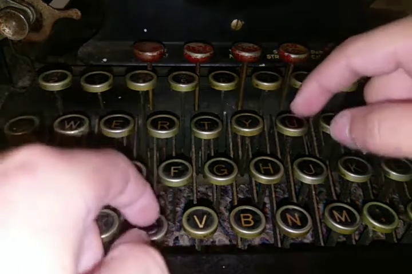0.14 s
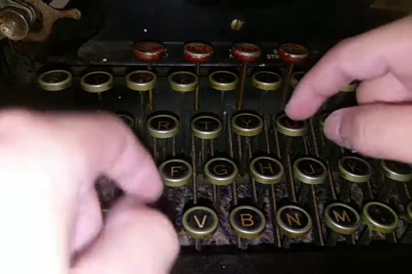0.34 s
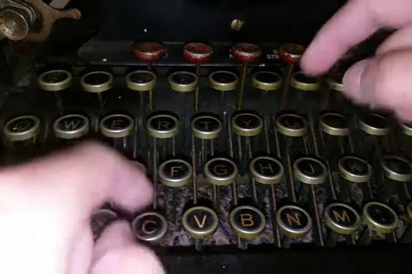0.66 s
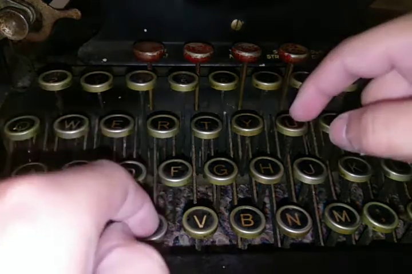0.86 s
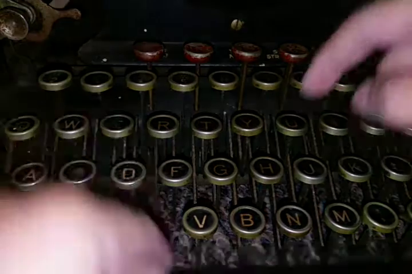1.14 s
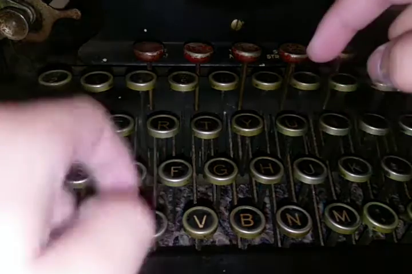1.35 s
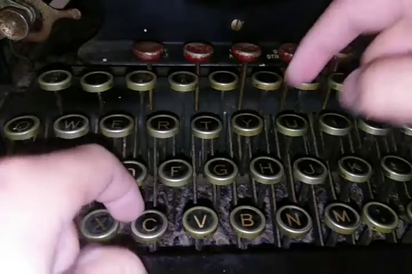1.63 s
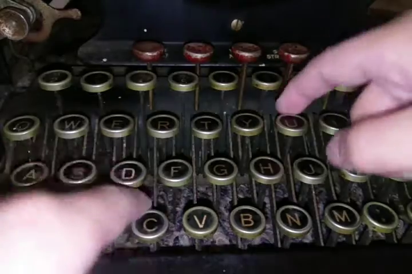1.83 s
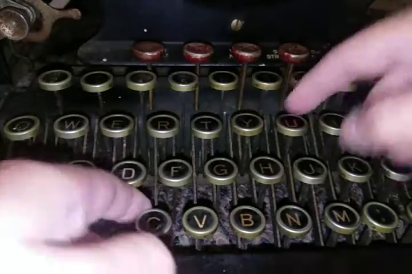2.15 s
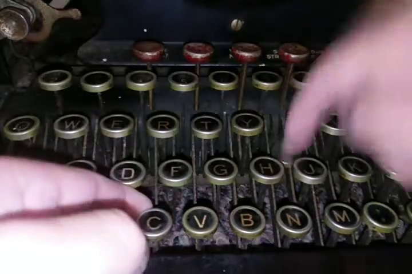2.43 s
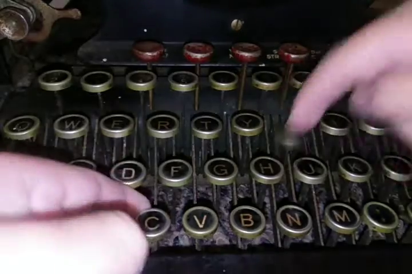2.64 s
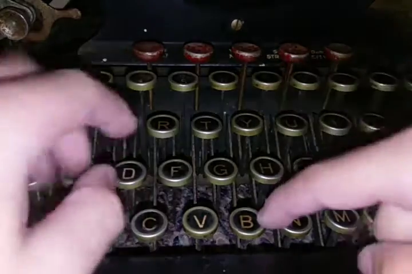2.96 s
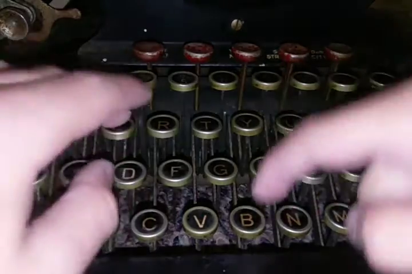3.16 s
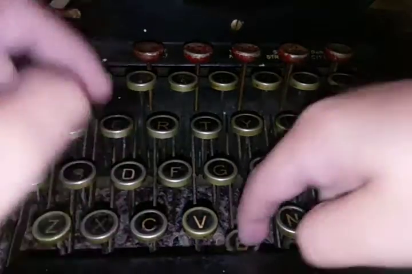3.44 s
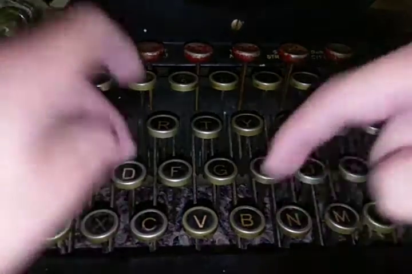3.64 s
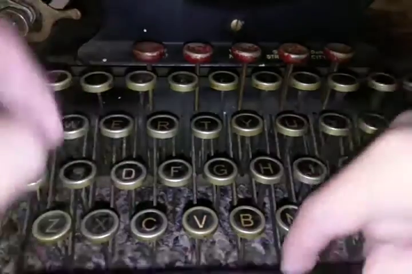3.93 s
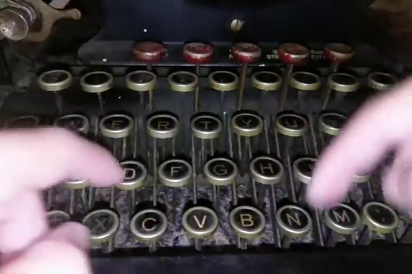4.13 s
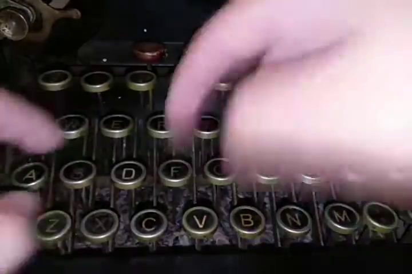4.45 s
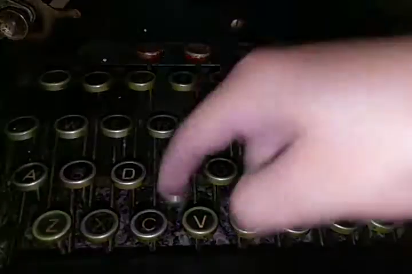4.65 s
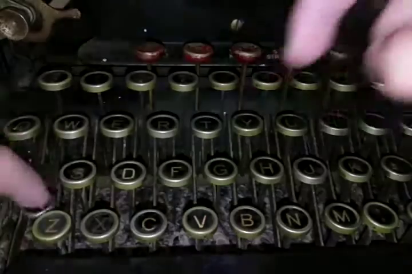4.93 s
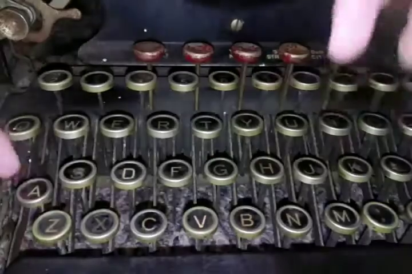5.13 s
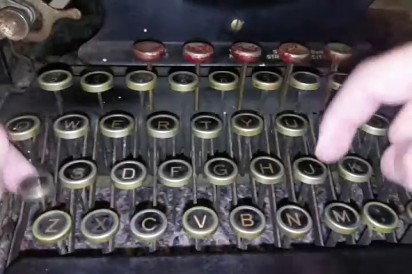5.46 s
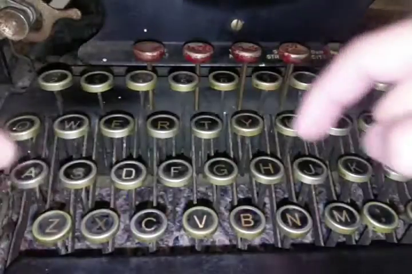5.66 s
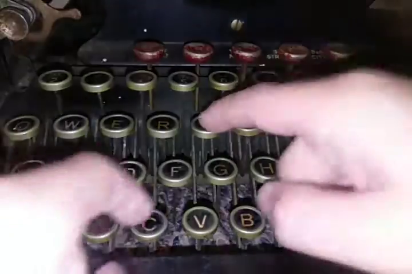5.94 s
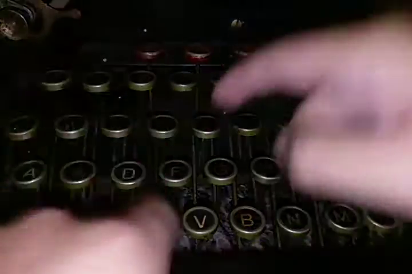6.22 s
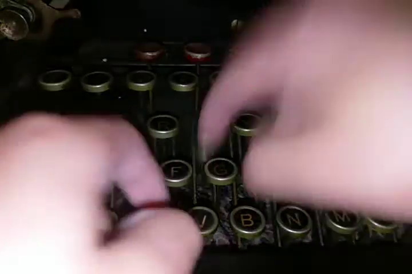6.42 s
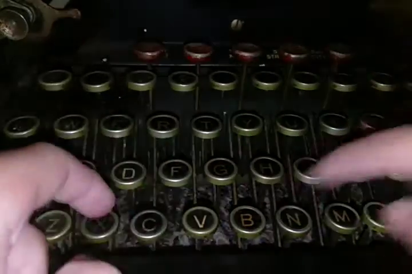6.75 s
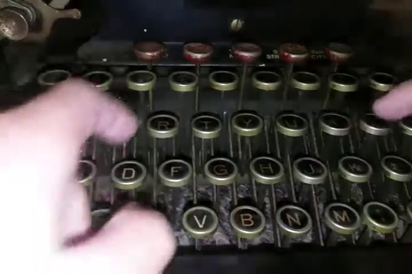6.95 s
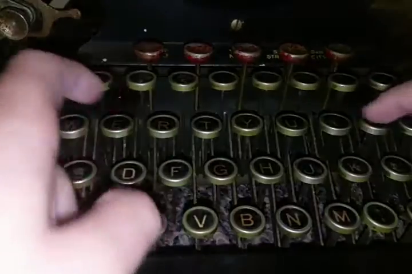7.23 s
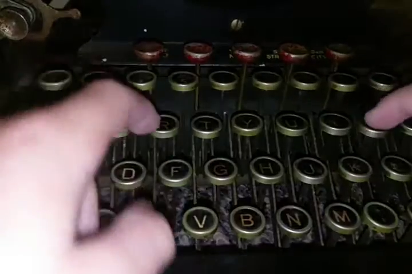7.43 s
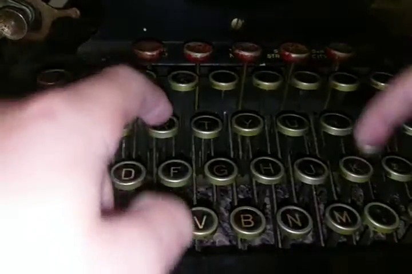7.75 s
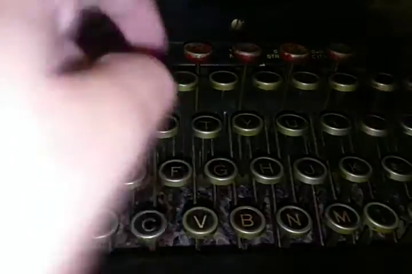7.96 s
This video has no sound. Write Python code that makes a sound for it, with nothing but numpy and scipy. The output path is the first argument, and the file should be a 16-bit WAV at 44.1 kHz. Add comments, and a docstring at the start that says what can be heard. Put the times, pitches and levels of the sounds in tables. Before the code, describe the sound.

Keys of an old manual typewriter clack slowly and unevenly, close by, with small mechanical clicks between strokes in a quiet room.

```python
"""A small quiet room: two fingers peck at an old manual typewriter, close by.
Per stroke the key lever clicks, the escapement trips, the type slaps the platen and rings the steel
frame, then the typebar drops on its rest and the desk shudders. The carriage catch clicks on key
release. One key jams with a hollow knock. A hard surface and the room answer, over faint hiss and hum."""
import sys
import numpy as np
from scipy import signal
from scipy.fft import rfft, irfft
from scipy.io import wavfile
from scipy.ndimage import uniform_filter1d

SR = 44100
rng = np.random.default_rng(int(sys.argv[2]) if len(sys.argv) > 2 else 0)


def transcribe(signal):
    """Save signal, clipped to [-1, 1], as a 16-bit WAV file at the path in sys.argv[1]."""
    frames = np.atleast_2d(signal).T
    limited = np.clip(frames, -1, 1)
    pcm = np.round(limited * 32767).astype(np.int16)
    wavfile.write(sys.argv[1], SR, pcm)


N = 356636
T = np.arange(SR // 2) / SR  # seconds since a contact

# Letters. Each row: slap time in seconds, force in dB, body below 3 kHz in dB, sparkle above 7 kHz
# in dB, lever click gain in dB, key travel before the slap in seconds, typebar fall after it in seconds.
LETTERS = [ (1.088, -1, 0, 1.5, -23, .036, 0.092), (2.3993, .5, 2, .5, -18, 0.032, 0.15),
           (3.2778, 0, -.5, 1.5, -19.5, .0385, .143), (3.5191, 0.5, 0, 1, -21.5, .0444, .104),
           (3.743, -11.5, -5, 1, -21.5, .025, .1746), (4.4648, 1.5, 0, .5, -18.5, .0319, 0.13),
           (4.856, -0.5, -1.5, -2, -26, 0.041, 0.12), (6.1715, 1, -0.5, 0, -19, 0.039, .1077),
           (6.3818, .5, 0.5, -0.5, -19, 0.042, 0.13), (7.609, -1, -1, -0.5, -22.5, 0.049, .101),
           (7.9867, 2, -0.5, -1.5, -20, 0.037, 0.092)]
# Carriage catch clicks. Each row: start in seconds, gain in dB, body below 3 kHz in dB.
CATCH_CLICKS = [(1.1553, -17.5, -2), (1.229, -26, -0.5), (2.599, -19.5, 1.5), (3.5, -15.5, -1),
                (3.958, -23, -7.5), (4.6695, -26, -2), (5.4283, -23, -1.5), (6.5825, -21, -1.5),
                (7.7757, -25, -1.5)]
# Fingertips brushing keys. Each row: start in seconds, gain in dB.
KEY_TOUCHES = [(2.857, -47), (2.876, -53.5), (3.0337, -46.5), (3.057, -46), (3.099, -51.5), (5.1913, -49.5),
               (5.412, -44.5), (7.2855, -42.5), (7.419, -50.5)]
# Spectra of type slap, sharp click, dull clack, rocking machine. Each row: frequency in Hz, gain in dB.
SLAP_EQ = [(40, -33), (350, -30), (800, -32.5), (1500, -20), (3000, -15), (4400, -11.5), (5100, -4),
           (6300, -6), (7900, -2), (9000, -10.5), (12000, -22), (15500, -25)]
CLICK_EQ = [(40, -14.5), (200, -10), (500, -13), (1000, -13.5), (1700, -7), (2900, -6.5), (3550, -3.5),
            (4400, -6), (5400, -6), (6500, -1), (8100, -.5), (10000, -6), (12500, -14), (15500, -18)]
CLACK_EQ = [(60, -4), (200, -9), (500, -11.5), (800, -7), (1400, -5), (2200, 1.5), (3000, -4), (5400, -9),
            (7500, -5), (10000, -9), (12000, -18), (15500, -20)]
ROCKING_EQ = [(20, -22), (50, 1.5), (110, 2.5), (170, -8), (330, -9.5), (500, -15.5), (1200, -45.5),
              (4000, -81)]
# Steel frame and bar resonances. Each row: frequency in Hz, width in Hz, lift in dB.
FRAME_MODES = [(1005, 70, 5), (1560, 160, 3), (1830, 90, 3), (2240, 80, 5), (2410, 60, 3), (3270, 110, 4),
               (3930, 170, 5), (4865, 70, 7), (5150, 130, 3), (5385, 60, 5), (5490, 90, 4), (5890, 50, 4),
               (6843, 20, 6.5), (7105, 25, 3), (7540, 25, 4), (7738, 22, 7), (7990, 35, 3.5), (8360, 40, 3)]
# Hollow case modes. Each row: frequency in Hz, relative level in dB, T60 in seconds.
CASE_MODES = [(232, -3, 0.21), (316, 2, 0.13), (487, -3, 0.09), (770, 0, 0.06), (900, -3.5, 0.15),
              (1093, -15, 0.047), (1300, -13, 0.14)]
# Desk modes. Each row: frequency in Hz, relative level in dB, T60 in seconds, rise in seconds.
DESK_MODES = [(55.5, 3.5, 0.37, 0.034), (84, 5, 0.28, 0.056), (100, 2, 0.2, .025), (111, 1.5, 0.31, 0.029),
              (150, -8.5, .16, 0.015), (217, -12.5, 0.25, .004), (300, -14.5, 0.053, 0.0059)]
# Spectra of hard-surface echo, room tail, room hiss. Each row: frequency in Hz, gain in dB.
ECHO_EQ = [(200, -11.5), (2000, -13), (4500, -16), (6000, -11), (7500, -4), (9000, -10), (15000, -10)]
TAIL_EQ = [(60, -4.5), (300, -1.5), (1000, -4), (2500, -7), (4600, -10), (5500, -7), (6300, -4),
           (7600, -7.5), (9000, -9), (15000, -2.5)]
HISS_EQ = [(15, -50), (25, -26), (42, -6.5), (64, -0.5), (86, -11), (150, -10), (175, -17.5), (220, -17),
           (450, -25.5), (600, -25.5), (1100, -29), (3000, -32.5), (7500, -34), (15500, -44.5)]
# Room decay. Each row: frequency in Hz, T60 in seconds.
TAIL_DECAY = [(100, 0.19), (500, 0.225), (2000, 0.265), (7000, 0.29), (10000, .28), (15000, 0.16)]


def typing(trip_lead_s=.0092, slide_s=.015):
    """Per letter: key lever, escapement, slap, typebar return."""
    out = np.zeros(N)
    for at_s, force_db, body_db, sparkle_db, lever_db, travel_s, fall_s in LETTERS:
        add(out, at_s - travel_s, key_move(lever_db, body_db=-2.5))
        add(out, at_s - trip_lead_s, amp(force_db - 22) * escapement())
        add(out, at_s, amp(force_db + 5.5) * slap(body_db, sparkle_db))
        add(out, at_s + fall_s - slide_s, typebar_return(slide_s))
    return out


def slap(body_db, sparkle_db):
    """Type hits the platen; the roller clacks, loose bars and springs jingle."""
    blow = colour(burst(fade(.014) + amp(-21) * fade(.1)), SLAP_EQ)
    blow = in_room(weighted(blow, body_db, sparkle_db), echo_db=2)
    roller = colour(rattle(rough_db=2) * rise(.002) * fade(.045), CLACK_EQ)
    jingle = colour(rattle(rough_db=5) * rise(.005) * fade(.22), CLICK_EQ)
    return blow + amp(body_db - 19.5) * roller + amp(-35.5) * jingle


def escapement():
    """The escapement lets go with a short rasp."""
    rasp = colour(rattle(rough_db=1.5) * rise(.0008) * fade(.14), CLICK_EQ)
    return rasp + amp(-28) * desk_shudder()


def typebar_return(slide_s, gain_db=-25.5):
    """A spring pulls the bar home, whatever the force: slide, clack, desk shudder, one bounce."""
    out = np.zeros(N)
    slide = colour(rattle(rough_db=4) * rise(.005) * fade(.1), CLACK_EQ)
    clack = colour(rattle(rough_db=3.5) * rise(.001) * fade(.066), CLACK_EQ)
    bounce = colour(rattle(rough_db=3) * fade(.042), CLICK_EQ)
    add(out, 0, amp(gain_db - 13.5) * slide)
    add(out, slide_s, amp(gain_db) * in_room(clack) + amp(-45) * desk_shudder())
    add(out, slide_s + rng.uniform(.012, .025), amp(gain_db - 13) * bounce)
    return out


def lever_click(body_db):
    """A lever catches with a short chatter, then scrapes in its slot."""
    catch = rattle(rough_db=2.5) * rise(.0015) * fade(.038)
    scrape = rattle(rough_db=4) * amp(-24) * fade(.21)
    return amp(2) * in_room(weighted(colour(catch + scrape, CLICK_EQ), body_db))


def key_move(click_db, body_db):
    """A key going down or up clicks and nudges the desk."""
    return amp(click_db) * lever_click(body_db) + amp(-52) * desk_shudder()


def catch_and_touches():
    """The carriage catch clicks on release; brushed keys tick in their slots."""
    out = np.zeros(N)
    for at_s, gain_db, body_db in CATCH_CLICKS:
        add(out, at_s, key_move(gain_db, body_db))
    for at_s, gain_db in KEY_TOUCHES:
        add(out, at_s, amp(gain_db) * lever_click(body_db=0))
    return out


def jam(at_s=3.746):
    """A jammed key bottoms out: its bar clatters on its neighbours, the case rings hollow."""
    out = np.zeros(N)
    ring = sum(amp(db) * fade(t60_s) * np.sin(2 * np.pi * (hz * T + rng.random()))
               for hz, db, t60_s in CASE_MODES)
    clatter = colour(rattle(rough_db=1) * rise(.0016) * fade(.063), CLICK_EQ)
    add(out, at_s, amp(-33) * rise(.0012) * ring / np.abs(ring).max())
    add(out, at_s, amp(-12) * in_room(weighted(clatter, body_db=1)) + amp(-44.5) * desk_shudder())
    return out


def steel_frame(x):
    """The frame lifts its own resonances in every contact."""
    hz = np.fft.rfftfreq(len(T), 1 / SR)
    response = 1 + sum((amp(db) - 1) * 1j * hz * width_hz / (mode_hz ** 2 - hz ** 2 + 1j * hz * width_hz)
                       for mode_hz, width_hz, db in FRAME_MODES)
    return signal.fftconvolve(x, irfft(response)[:len(T) // 2])[:N]


def desk_shudder():
    """Low desk modes swell and decay, blurred by the loosely rocking machine."""
    rocking = unit(colour(noise(), ROCKING_EQ)) * rise(.017) * fade(.14)
    modes = np.zeros(len(T))
    for k, (hz, db, t60_s, rise_s) in enumerate(DESK_MODES):
        gain = (-1) ** k * amp(db + rng.normal(0, 1.9))
        modes += gain * rise(rise_s) * fade(t60_s) * np.sin(2 * np.pi * hz * T)
    return modes + amp(3) * rocking


def in_room(x, echo_db=-12, echo_s=.0157):
    """Direct sound, one hard-surface echo, diffuse tail."""
    hz, time_s, bands = signal.stft(noise(), SR, nperseg=256)
    decay = amp(-60 * time_s / along(TAIL_DECAY, hz)[:, None])
    tail = signal.istft(bands * decay, SR, nperseg=256)[1][:len(T)] * rise(.0065)
    # The room sums all sides of the machine, so only the broad spectrum survives.
    radiated = np.sqrt(np.abs(uniform_filter1d(np.abs(rfft(x)) ** 2, size=300)))
    diffuse = colour(irfft(rfft(tail / np.linalg.norm(tail)) * radiated, len(T)), TAIL_EQ)
    taper = np.minimum(1, (1 - T / T[-1]) * 2) ** 2
    echo = np.pad(colour(x, ECHO_EQ), (round(echo_s * SR), 0))[:len(T)]
    return x + amp(echo_db) * echo + diffuse * taper


def room_tone(hiss_db=-65, hum_db=-68.5, hum_hz=56, width_hz=7):
    """Faint hiss and a wavering low hum."""
    hz = np.fft.rfftfreq(N, 1 / SR)
    hiss_bins, hum_bins = rfft(rng.standard_normal((2, N)))
    hiss = unit(irfft(hiss_bins * amp(along(HISS_EQ, hz)), N))
    hum = unit(irfft(hum_bins * np.exp(-((hz - hum_hz) / width_hz) ** 2), N))
    return amp(hiss_db) * hiss + amp(hum_db) * hum


def amp(db):
    return 10 ** (np.asarray(db) / 20)


def unit(x):
    return x / np.sqrt(np.mean(x ** 2) + 1e-20)


def rise(tau_s):
    return 1 - np.exp(-T / tau_s)


def fade(t60_s):
    return np.exp(-np.log(1000) * T / t60_s)


def noise():
    return rng.standard_normal(len(T))


def rattle(rough_db):
    """Noise broken into tiny contacts of about 1 ms."""
    return unit(noise() * amp(rough_db * unit(uniform_filter1d(noise(), size=48))))


def burst(envelope):
    """Shaped noise with its broad spectrum flattened."""
    spectrum = rfft(noise() * envelope)
    power = np.abs(spectrum) ** 2
    flatten = np.sqrt(power.mean() / np.abs(uniform_filter1d(power, size=500)))
    return irfft(spectrum * flatten, len(T)) * (T < T[-1] / 2)


def along(points, hz):
    """Interpolate (Hz, value) points over log frequency."""
    points_hz, values = np.transpose(points)
    return np.interp(np.log(hz + 1), np.log(points_hz), values)


def colour(x, eq, taps=2048):
    """Minimum-phase filter from (Hz, dB) points."""
    cepstrum = irfft(np.log(amp(along(eq, np.fft.rfftfreq(taps, 1 / SR)))))
    cepstrum[1:taps // 2] *= 2
    cepstrum[taps // 2 + 1:] = 0
    impulse = irfft(np.exp(rfft(cepstrum)))
    return signal.fftconvolve(x, impulse)[:len(x)]


def weighted(x, body_db, sparkle_db=0):
    """Heavy contacts carry more lows, sharp ones more top."""
    return colour(x, [(3000, np.clip(body_db, -15, 15)), (5300, .0027), (7000, sparkle_db)])


def add(track, at_s, sound):
    start = int(np.clip(round(at_s * SR), 0, N))
    track[start:start + len(sound)] += sound[:N - start]


def scene():
    """All contacts through the frame, over room tone; mono."""
    contacts = typing() + catch_and_touches() + jam()
    return (steel_frame(contacts) + room_tone())[None]


def record(dry, low_hz=38, top_hz=15600):
    """The hardest slaps clip; deep bass and extreme top are cut."""
    highpass = signal.butter(3, low_hz, "high", fs=SR, output="sos")
    thinned = signal.sosfilt(highpass, np.clip(dry, -1, 1))
    hz = np.fft.rfftfreq(2 * N, 1 / SR)
    lowpass = np.clip((top_hz - hz) / 300 + .5, 0, 1)
    return irfft(rfft(thinned, 2 * N) * lowpass)[:, :N]


dry = scene()
out = record(dry)
transcribe(out)
```